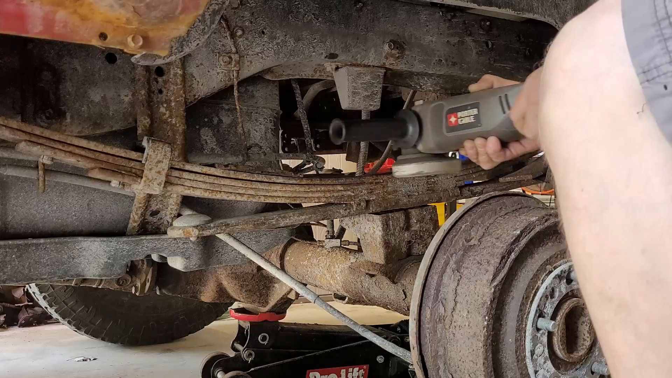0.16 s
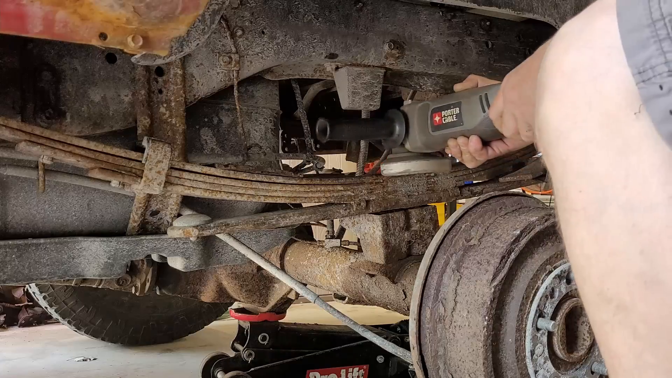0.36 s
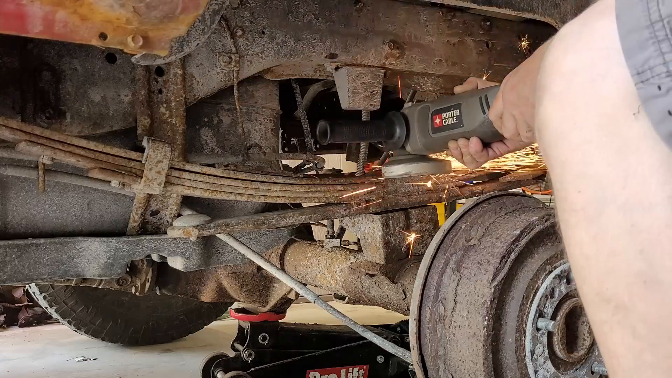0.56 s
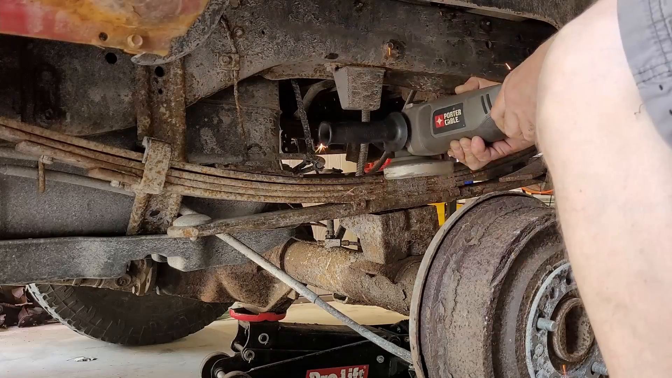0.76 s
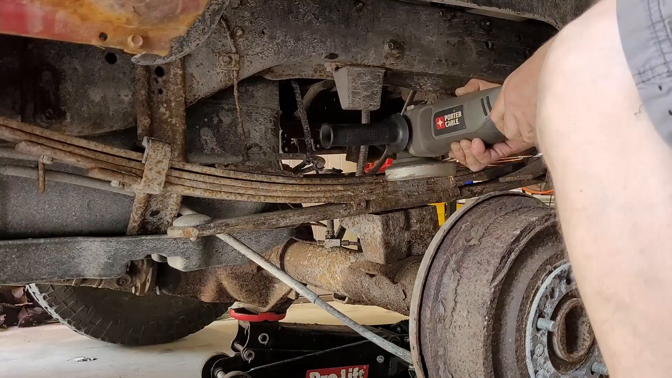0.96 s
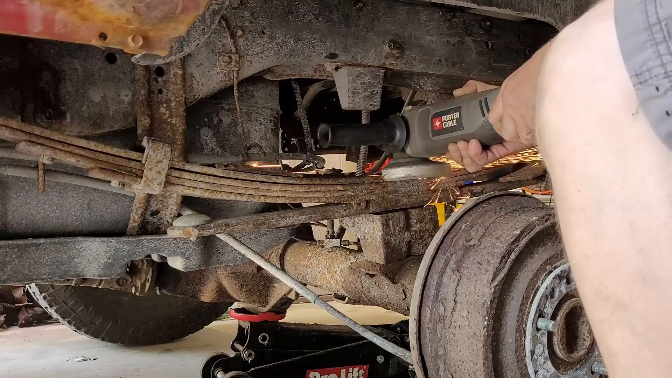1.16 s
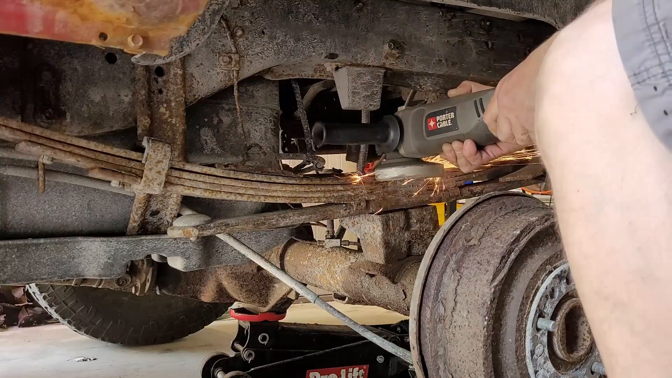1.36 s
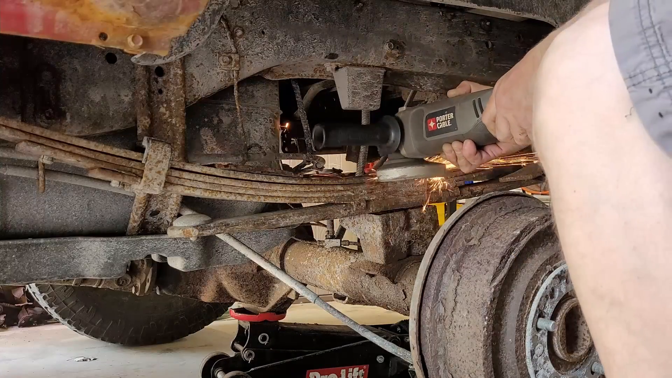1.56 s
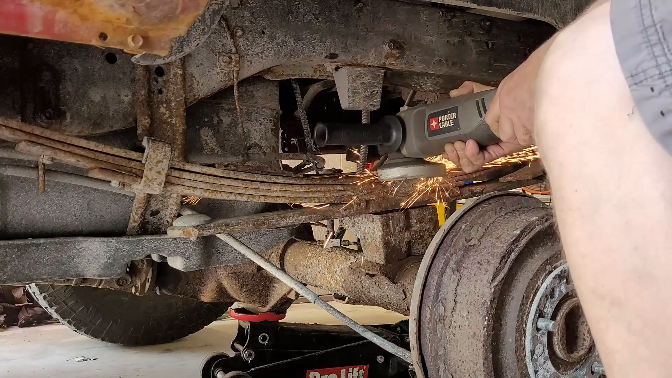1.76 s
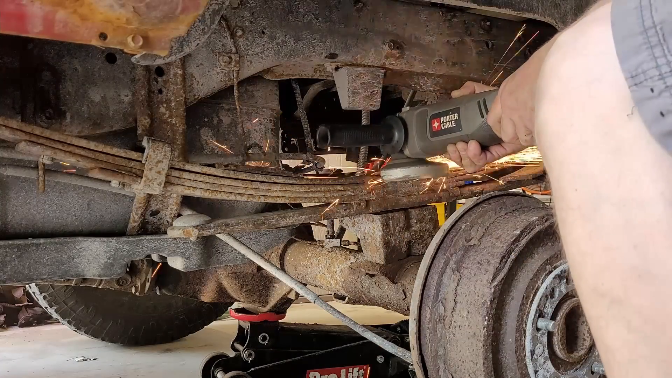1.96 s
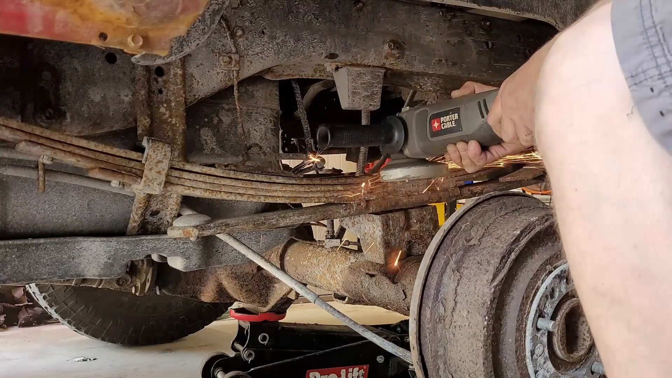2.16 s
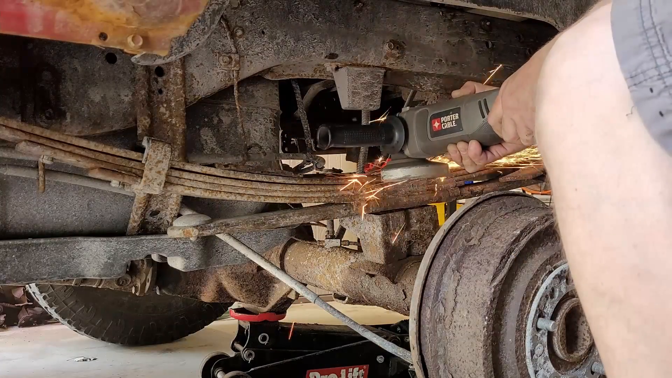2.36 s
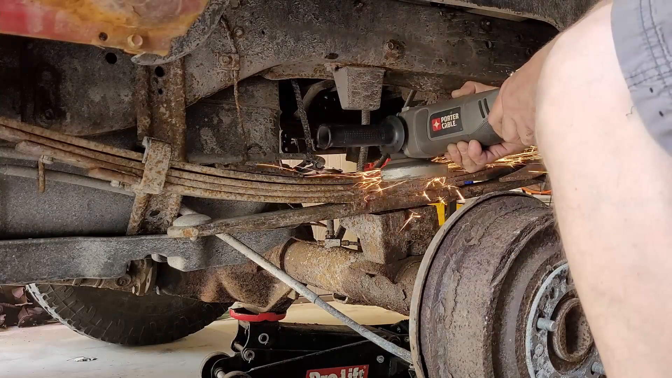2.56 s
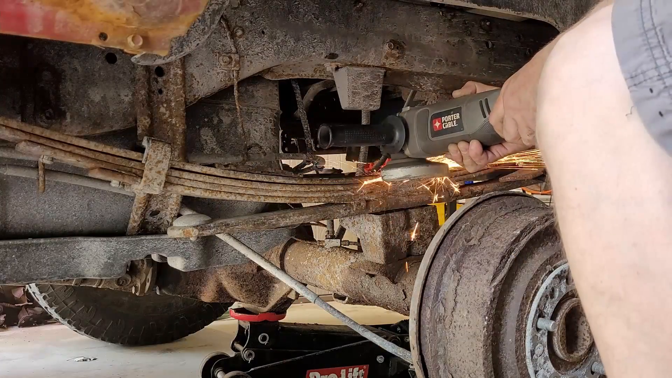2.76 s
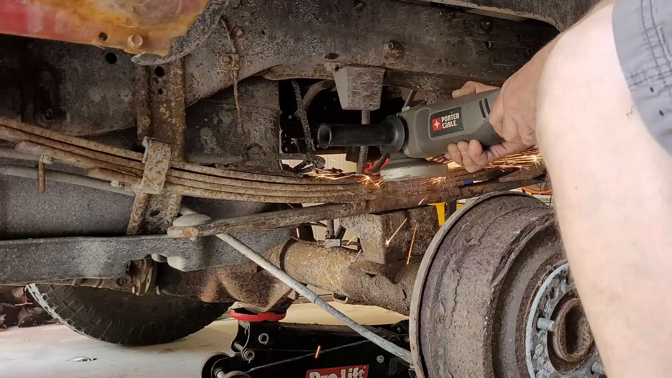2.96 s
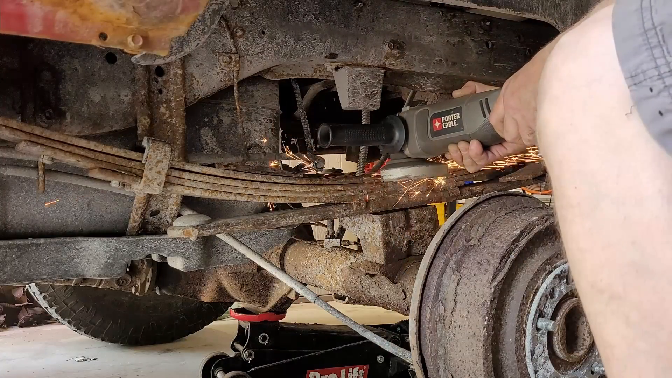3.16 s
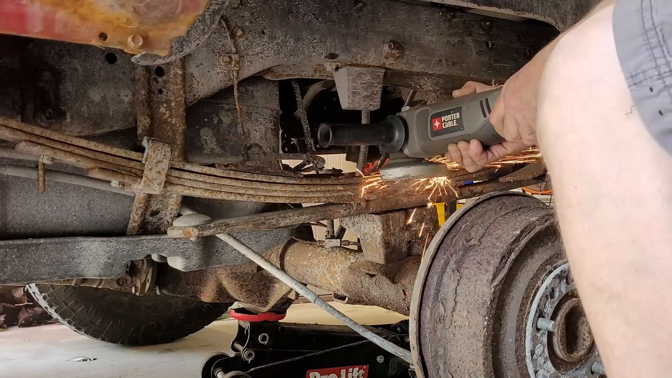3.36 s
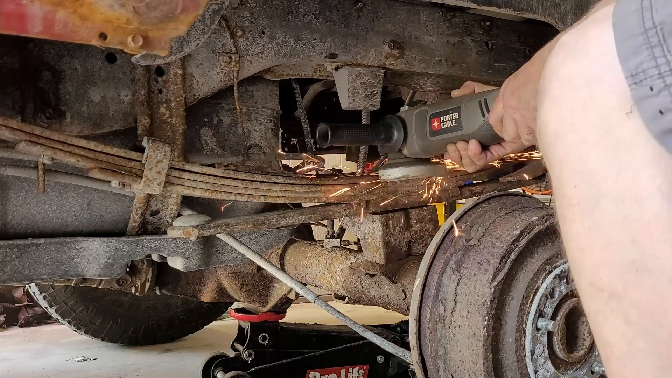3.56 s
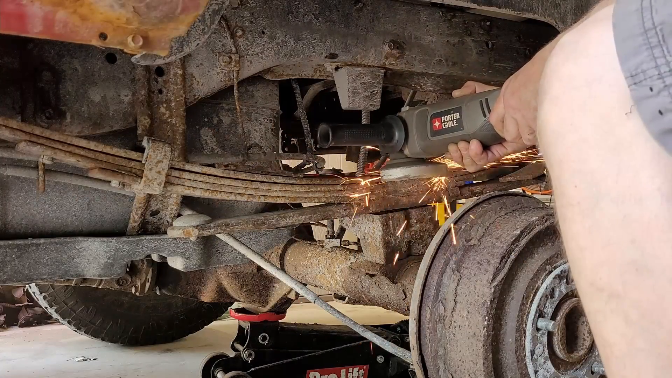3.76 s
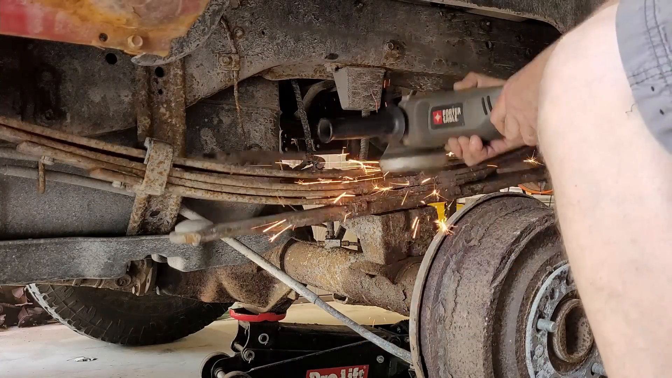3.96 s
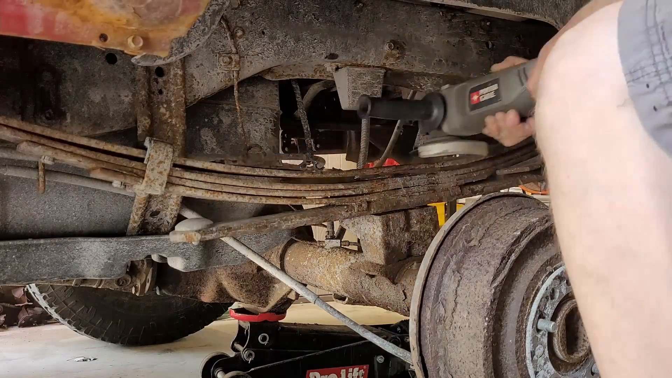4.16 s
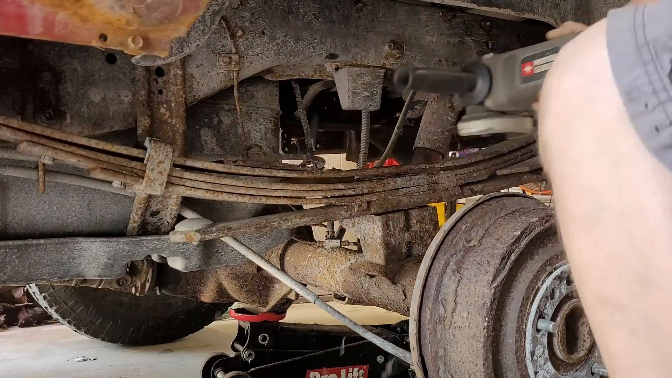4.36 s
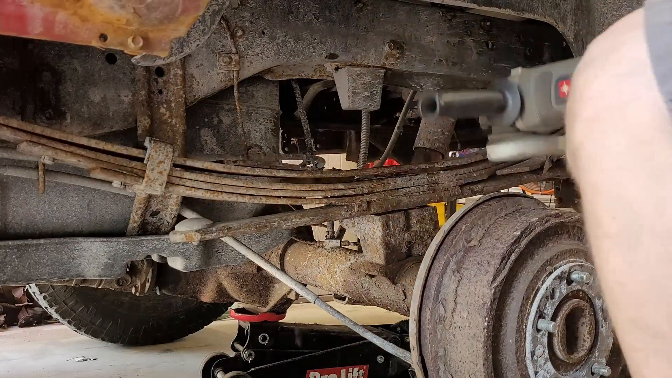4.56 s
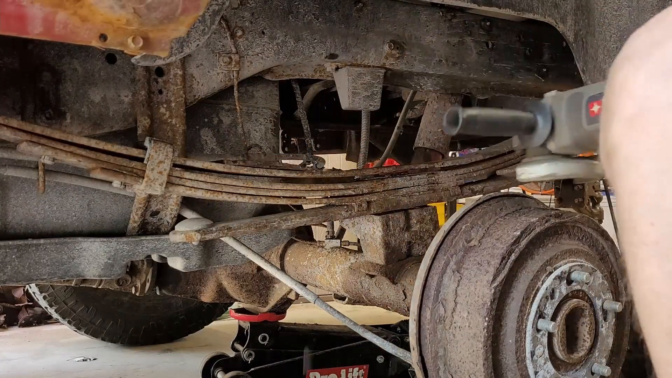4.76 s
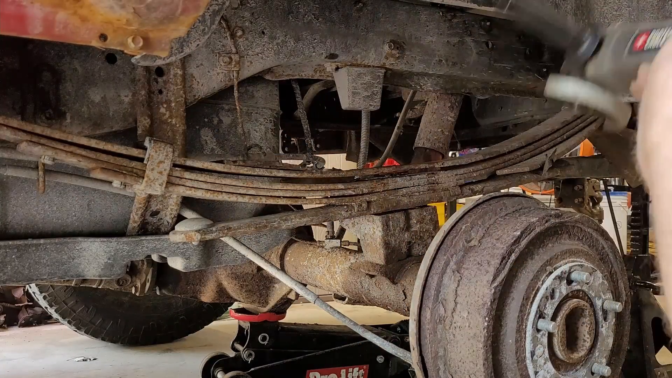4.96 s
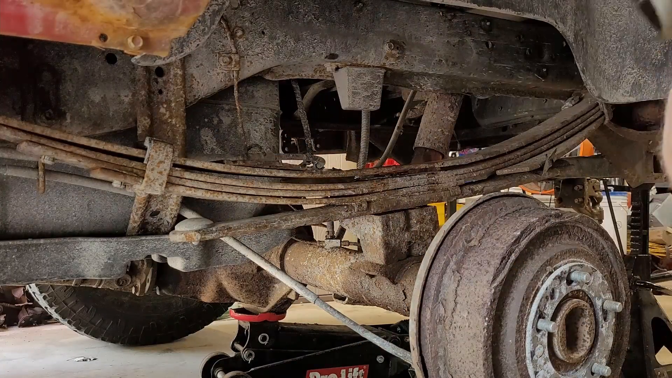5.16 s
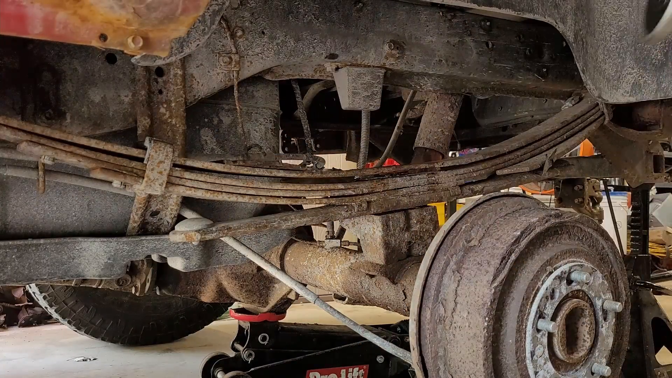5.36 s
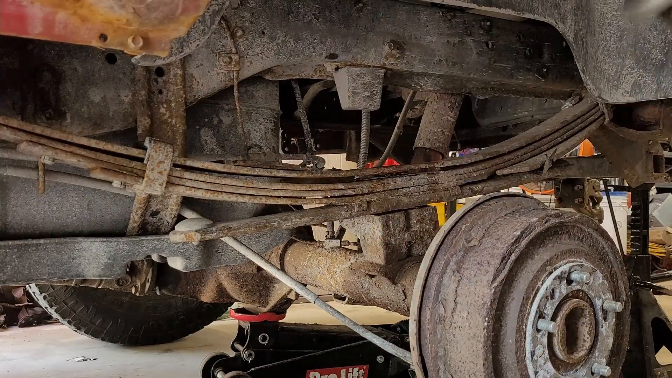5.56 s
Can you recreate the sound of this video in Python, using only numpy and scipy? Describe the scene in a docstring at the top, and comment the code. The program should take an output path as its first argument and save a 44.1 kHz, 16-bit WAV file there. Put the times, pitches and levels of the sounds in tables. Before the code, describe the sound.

An angle grinder bites into rusty steel, its whine sinking, then snags with a bang and winds down rattling.

```python
"""An angle grinder runs free in a garage: fan air rushes and bevel gears rattle over a faint whine.
Its disc bites into a rusty leaf spring under a truck, and abrasion adds a rasping, sparking hiss.
The whine is made of harmonics of motor and disc speed, so it sinks as the load grows, until the
disc snags and kicks back, its impacts setting the chassis booming.
Lifted clear, the tool speeds up, then coasts down with its teeth clattering across their backlash."""
import sys
import numpy as np
from scipy import signal
from scipy.fft import rfft, irfft, next_fast_len
from scipy.io import wavfile
from scipy.ndimage import map_coordinates

SR = 44100
rng = np.random.default_rng(int(sys.argv[2]) if len(sys.argv) > 2 else 0)


def digitize_waveform(pressure):
    """Quantize a signal to 16-bit integers and store it at the path in sys.argv[1].

    Rows of a 2-D input are taken as channels; values are limited to [-1, 1].
    """
    field = np.atleast_2d(pressure).T
    bounded = np.clip(field, -1, 1)
    quanta = np.round(bounded * 32767).astype(np.int16)
    wavfile.write(sys.argv[1], SR, quanta)


N = 247886
TIME = np.arange(N) / SR
BINS = np.maximum(np.arange(N // 2 + 1) * SR / N, 1)   # f/Hz
MOTOR, DISC = 1, 9 / 34   # turns of each shaft per motor turn

# resonances and dips of the spring and the guard: f/Hz, bandwidth/Hz, lift/dB
STEEL_MODES = [(444, 42, 13), (718, 11, 18), (2094, 48, 4), (6850, 390, 3), (7040, 290, -6), (8230, 270, 5),
               (9400, 220, 3.5), (15440, 470, 5.5)]
# noise of the unloaded gears: t/s, level/dB
GEAR_LEVEL = [(0, -29.5), (.45, -28), (.8, -25.5), (4.2, -36), (4.5, -29.5), (4.85, -30.5), (5.08, -35),
              (5.42, -23.5), (5.62, -28)]


def from_db(db):
    """Amplitude grows tenfold every 20 dB."""
    return 10 ** (np.asarray(db) / 20)


def rms_one(x):
    """Normalisation to unit mean power."""
    return x / np.sqrt(np.mean(x ** 2) + 1e-20)


def in_time(curve):
    """Linear interpolation of a (t/s, value) curve at every sample."""
    return np.interp(TIME, *np.transpose(curve))


def over_hz(curve):
    """Interpolation of an (f/Hz, value) curve at every bin, on a logarithmic frequency axis."""
    hz, value = np.transpose(curve)
    return np.interp(np.log(BINS), np.log(hz), value)


def drift(corner_hz):
    """Random fluctuation: low-passed noise of unit power."""
    size = next_fast_len(N)
    hz = np.arange(size // 2 + 1) * SR / size
    spectrum = rfft(rng.standard_normal(size)) / (1 + (hz / corner_hz) ** 2)
    return rms_one(irfft(spectrum, size)[:N])


def swell(s, half_length, db):
    """A Gaussian envelope centred on time s."""
    return from_db(db) * np.exp(-np.minimum(((TIME - s) / half_length) ** 2, 100) / 2)


def bursts(times, levels_db, rise, decay):
    """Incoherent addition: the envelope of short bursts whose powers sum; time constants in seconds."""
    power = np.zeros(N)
    power[np.round(np.asarray(times) * SR).astype(int)] = from_db(levels_db) ** 2
    fall, attack = np.exp(-2 / (decay * SR)), np.exp(-1 / (rise * SR))
    decaying = signal.lfilter([1], [1, -fall], power + 1e-18)
    return np.sqrt(signal.lfilter([1 - attack], [1, -attack], decaying))


def diffuse(gain=1, source=None):
    """A diffuse field is coherent between the ears only in the bass; the default source is white noise."""
    # likeness of the two ears: f/Hz, correlation
    coherence = [(60, 0.5), (125, 1), (250, 0.76), (500, 0.78), (1000, 0.42), (2000, 0.3), (4000, -0.06),
                 (8000, 0)]
    alike = np.clip(over_hz(coherence), -1, 1)
    mid, side = rfft(rng.standard_normal((2, N)) if source is None else source)
    ears = np.sqrt(1 + alike) * mid + np.sqrt(1 - alike) * side * [[1], [-1]]
    return rms_one(irfft(gain * ears, N))


def noise(spectrum, ringing_db=0, source=None):
    """Spectral shaping: diffuse noise of unit power, rolling off below the table's first point."""
    roll_off = 1 + (spectrum[0][0] / BINS) ** 2
    return diffuse(from_db(over_hz(spectrum) + ringing_db) / roll_off, source)


def resonate(x, hz, width):
    """A two-pole resonator of unit peak gain."""
    r = np.exp(-np.pi * width / SR)
    feedback = [1, -2 * r * np.cos(2 * np.pi * hz / SR), r * r]
    return signal.lfilter(np.array([1, 0, -1]) * (1 - r * r) / 2, feedback, x)


def lift_db(hz, resonances):
    """Each resonance lifts nearby frequencies along a Lorentzian curve."""
    return sum(db / (1 + (2 * (hz - centre) / width) ** 2) for centre, width, db in resonances)


def garage(x, wet_db, t60):
    """Reverberation: dense reflections from chassis, floor and walls decay behind the direct sound."""
    tail = diffuse() * from_db(-60 * TIME / t60)
    tail /= np.sqrt(np.sum(tail ** 2) / 2)
    wet = from_db(wet_db)
    reflections = signal.fftconvolve(np.atleast_2d(x), tail, axes=1)[:, :N]
    return (x + wet * reflections) / np.sqrt(1 + wet ** 2)


def touching(attack_s=0.0026, release_s=0.012):
    """Contact gate: 1 while the disc is on the steel, 0 while it is clear."""
    # spells of contact: start t/s, end t/s
    contacts = [(0.531, 0.763), (0.859, 4.015)]
    return sum(np.clip((TIME - start) / attack_s, 0, 1) * np.clip(1 - (TIME - end) / release_s, 0, 1)
               for start, end in contacts)


def firmness(speed, free_hz=539, seated_hz=410):
    """Load slows a motor: 0 with the disc spinning free, 1 with it seated in the cut."""
    return touching() * np.clip((free_hz - speed) / (free_hz - seated_hz), 0, 1)


def once_a_turn(speed, sharpness):
    """Periodic amplitude modulation: one pulse per turn of a shaft, at unit power."""
    return rms_one(np.exp(sharpness * np.cos(2 * np.pi * np.cumsum(speed) / SR)))


def turning_noise(speed, share, rim_points=384, kept_per_turn=0.88):
    """Repetition makes a comb spectrum: a share of the noise returns, slowly changing, each disc turn."""
    turns = np.cumsum(speed * DISC) / SR
    fresh = rng.standard_normal((2, int(turns[-1]) + 2, rim_points))
    rim = signal.lfilter([1], [1, -kept_per_turn], fresh, axis=1)
    repeating = np.array([map_coordinates(side.ravel(), [turns * rim_points], order=3) for side in rim])
    return np.sqrt(share) * rms_one(repeating) + np.sqrt(1 - share) * rng.standard_normal((2, N))


def partial(hz):
    """A gliding sinusoid of unit power with an interaural phase difference."""
    phase = 2 * np.pi * np.cumsum(hz) / SR + rng.uniform(0, 2 * np.pi)
    ear_shift = rng.uniform(-0.88, 0.56) * np.array([[1], [-1]])
    return np.sqrt(2) * np.sin(phase + ear_shift)


def shaft_tone(speed, multiple, db, flutter_db, radiation_top_hz=4610):
    """Forced vibration: in contact, a tone swells as it crosses a resonance; high tones radiate poorly."""
    # resonances and dips of the disc: f/Hz, bandwidth/Hz, lift/dB
    disc_modes = [(1583, 36, -23), (1950, 60, -8), (2160, 200, 3.5), (3030, 140, 1.5), (3170, 78, 5),
                  (3480, 23, 4.5), (3720, 130, -6), (4400, 190, 3.5), (4920, 58, 5)]
    hz = multiple * speed
    steady = from_db(db + touching() * lift_db(hz, STEEL_MODES + disc_modes))
    steady /= np.sqrt(1 + (hz / radiation_top_hz) ** 20)
    return (steady * from_db(flutter_db * drift(30)) + squeal(multiple)) * partial(hz)


def whine(speed):
    """Shaft harmonics, frequency-modulated by a jitter in speed that lessens as the disc seats."""
    # wobble of the disc, strongest when free: multiple of disc speed, level/dB
    wobble_orders = [(2, -56), (4, -58)]
    # tones of the unloaded motor: multiple of motor speed, level/dB
    idle_orders = [(2, -51), (3, -48)]
    seated = firmness(speed)
    shaken = speed * (1 + (0.00039 + 0.002714 * (1 - seated)) * drift(42.5))
    wobble = sum(shaft_tone(shaken, k * DISC, db, flutter_db=2) for k, db in wobble_orders)
    idle = (1 - touching()) * sum(shaft_tone(shaken, k, db, flutter_db=1) for k, db in idle_orders)
    loaded = touching() * singing(shaken, seated)
    return garage(loaded + idle + (1 - 0.72 * seated) * wobble, wet_db=-5.5, t60=0.25)


def fan(echo_gain=0.23):
    """Comb filtering: gusts from the vents interfere with their chassis echo, shifting as the tool moves."""
    # loudness of the fan air, which swells again near the end: t/s, relative level/dB
    air_level = [(0, -37.5), (.8, -34), (2, -38.5), (3.96, -40), (5.1, -38.5), (5.62, -31.5)]
    # colour of the air: f/Hz, spectrum level/dB
    air_spectrum = [(40, -13), (110, -14), (165, -23.5), (260, -3.5), (370, -10), (480, -3.5), (720, 0),
                    (1020, 0.5), (1350, -3.5), (1900, 0.5), (2400, 6), (3100, -1), (4800, -1.5), (6000, -9),
                    (16000, -18)]
    # lag of the echo as the tool is lifted away: t/s, delay/s
    echo_delay = [(4.0, 0.0012), (4.5, .002), (5.62, 0.00269)]
    air = from_db(in_time(air_level) + 9 + 0.93 * drift(23) + 0.62 * drift(3.8)) * noise(air_spectrum)
    echo = np.array([np.interp(TIME - in_time(echo_delay), TIME, side) for side in air])
    return air + echo_gain * echo


def lesser_clatters(count=170, gap_s=0.032, unevenness=0.46):
    """Backlash lets unloaded teeth knock irregularly; rows of t/s, knock level/dB, ping level/dB."""
    lateness, knock_scatter_db, ping_scatter_db = rng.standard_normal((count, 3)).T
    times = gap_s * (np.arange(count) + unevenness * lateness)
    gear_db = np.interp(times, *np.transpose(GEAR_LEVEL))
    free = (times > 0) & (times < TIME[-1]) & (np.interp(times, TIME, touching()) < 0.5)
    return np.transpose([times, gear_db + 4 - knock_scatter_db, gear_db - 17 - ping_scatter_db])[free]


def gears(speed, ping_hz=9290, ping_width_hz=490):
    """Impact excitation: unloaded teeth hiss and knock, ringing the case in pulses at the motor's rate."""
    # hiss of the meshing teeth: f/Hz, spectrum level/dB
    hiss_spectrum = [(400, -25), (1300, -2.5), (2300, -4.5), (3200, -4), (4500, -2), (5800, -10),
                     (8000, -9.5), (10500, -8), (13000, -10), (16000, -15)]
    # loudest clatters across the backlash: t/s, relative knock level/dB, relative ping level/dB
    rattles = [(.112, -21.5, -38), (.125, -25, -38), (0.268, -15, -23), (.368, -16.5, -33),
               (.408, -19, -36), (.429, -16, -40), (4.444, -16.5, -33), (4.462, -19, -26),
               (4.759, -20, -19), (4.781, -20, -28), (4.807, -20, -20.5), (4.833, -22, -36),
               (4.858, -20.5, -24), (4.892, -19.5, -38), (5.123, -17.5, -45), (5.172, -14.5, -46),
               (5.205, -13.5, -44), (5.229, -12, -40), (5.262, -14.5, -42), (5.284, -16, -23),
               (5.329, -17.5, -29), (5.355, -13, -20), (5.383, -12, -36), (5.4226, -8.5, -18),
               (5.43, -14, -30), (5.454, -14, -34), (5.495, -14.5, -26), (5.504, -11, -21),
               (5.545, -12.5, -20), (5.589, -15, -27), (5.609, -23, -30)]
    # modes of the gear case: f/Hz, bandwidth/Hz, relative level/dB
    case_modes = [(2680, 1000, 0), (3930, 1100, 8.5), (4337, 780, 9.5), (10900, 1600, -12)]
    # bright tick of teeth meeting: f/Hz, spectrum level/dB
    tick_spectrum = [(3000, 7), (10000, -5), (16000, -15)]
    hiss_gain = (1 - touching()) * from_db(in_time(GEAR_LEVEL) + 0.98 * drift(56))
    hiss = hiss_gain * noise(hiss_spectrum, source=turning_noise(speed, share=0.45))
    times, knock_db, ping_db = np.vstack([lesser_clatters(), rattles]).T
    teeth = once_a_turn(speed, sharpness=0.21) * diffuse()
    knocks = bursts(times, knock_db, rise=0.0008, decay=0.0093) * teeth
    case = sum((-1) ** k * from_db(db + 5) * resonate(knocks, hz, width)
               for k, (hz, width, db) in enumerate(case_modes))
    taps = bursts(times, ping_db + 16, rise=0.0006, decay=0.0041) * teeth
    ping = resonate(resonate(taps, ping_hz, ping_width_hz), ping_hz, ping_width_hz)
    ticks = bursts(times, knock_db - 8.5, rise=0.00022, decay=0.0022) * noise(tick_spectrum)
    return hiss + ticks + garage(case + ping, wet_db=-2.5, t60=0.11)


def background(hum_hz=79.6, hum_db=-66.5):
    """A low hum wavers by amplitude and phase modulation; bursts of bass noise make a few soft bumps."""
    # the hum grows near the end: t/s, lift/dB
    hum_swell = [(0, 5.5), (4.9, 1.5), (5.62, 18)]
    # soft bumps: t/s, level/dB
    bumps = [(.53, -36), (0.929, -35), (1.58, -40), (4.54, -45)]
    # colour of the bumps: f/Hz, spectrum level/dB
    bump_spectrum = [(20, -24), (52, 5), (80, -11), (200, -22), (600, -50)]
    hum_gain = from_db(hum_db + in_time(hum_swell) + 0.78 * drift(12))
    hum = hum_gain * np.sqrt(2) * np.sin(2 * np.pi * hum_hz * TIME + 0.34 * drift(3))
    return hum + bursts(*np.transpose(bumps), rise=0.0034, decay=0.017) * noise(bump_spectrum)


def singing(speed, seated, light_touch_loss_db=12):
    """Two harmonic series, of motor and of disc, sound under load and grow as the disc seats."""
    # motor harmonics: multiple of motor speed, relative level/dB
    motor_orders = [(1, -55.5), (2, -61), (7, -45.5), (8, -39.5), (9, -36), (10, -37.5), (11, -39),
                    (12, -35.5), (14, -32)]
    # disc harmonics: multiple of disc speed, relative level/dB
    disc_orders = [(12, -48), (16, -62), (17, -37.5), (19, -51), (20, -49), (21, -50.5), (22, -48),
                   (23, -46), (40, -40), (42, -41), (44, -46)]
    load_db = -0.5 - light_touch_loss_db * (1 - seated)
    motor = sum(shaft_tone(speed, k, db + load_db, flutter_db=2.1) for k, db in motor_orders)
    disc = sum(shaft_tone(speed, k * DISC, db + load_db, flutter_db=4.5) for k, db in disc_orders)
    return motor + disc


def cut(speed, spark_db=-24, usual_bite_db=-24.5):
    """Abrasion: grit tears steel in pulses at both shaft rates; grains recur each turn, so the hiss rings."""
    # how hard the grit bites: t/s, relative level/dB
    bite = [(.54, -31), (.66, -25), (.76, -30), (1.0, -27.5), (1.12, -22.5), (1.25, -24), (1.38, -25),
            (1.55, -24), (1.59, -28.5), (1.65, -23.5), (1.715, -27), (1.8, -24), (1.86, -26.5),
            (1.95, -25.5), (3.1, -28.5), (3.95, -28.5)]
    # grit tearing steel: f/Hz, spectrum level/dB
    grinding_spectrum = [(300, -9), (700, -17), (1400, -13.5), (1600, 4), (2200, 2), (2800, 1), (4300, 5),
                         (4950, 2), (5500, -15), (7500, -17), (10000, -20)]
    # the unseated disc scraping rust: f/Hz, spectrum level/dB
    scrape_spectrum = [(500, -31), (1000, 6), (1400, 1), (1800, 6.5), (2500, 8.5), (3200, -4.5), (5000, 0),
                       (6500, 2.5), (9000, -36)]
    # the spark stream: f/Hz, spectrum level/dB
    spark_spectrum = [(2000, -6.5), (5000, -11), (6000, -4.5), (7500, 1.5), (8900, -6.5), (10200, 1),
                      (12500, 3.5), (14000, 2), (15500, 1), (16500, -18.5)]
    bite_db = in_time(bite)
    loose = 1 - firmness(speed)
    pulses = once_a_turn(speed, sharpness=0.098) * once_a_turn(speed * DISC, sharpness=0.024)
    # a lightly held disc skips, so the sound surges
    grit = from_db(0.52 * drift(1000) + (0.5 + 0.54 * loose) * drift(14))
    ringing_db = 0.97 * lift_db(BINS, STEEL_MODES)
    grains = turning_noise(speed, share=0.65 - 0.3 * loose)
    grinding = from_db(bite_db + 3) * (1 - 0.16 * loose) * noise(grinding_spectrum, ringing_db, grains)
    scrape = from_db(bite_db + 2) * loose * noise(scrape_spectrum)
    sputter_db = (0.8 + 0.6 * loose) * drift(20)
    spark_gain = from_db(spark_db + sputter_db + 0.1 * (bite_db - usual_bite_db))
    sparks = spark_gain * noise(spark_spectrum, ringing_db, grains)
    # echoes from the close chassis ripple the spectrum
    return garage(touching() * pulses * grit * (grinding + scrape + sparks), wet_db=-3, t60=0.061)


def leaf_spring(speed, mode_hz=712.8, seated_db=-47):
    """A driven mode: the seated disc keeps the spring ringing faintly, and now and then drives it hard."""
    # flares of the ringing: t/s, half-length/s, level/dB
    flares = [(1.585, 0.032, -32), (1.8, 0.038, -44), (3.473, 0.037, -35.5), (3.925, 0.11, -41)]
    ring = from_db(seated_db) * firmness(speed) + sum(swell(*flare) for flare in flares)
    return ring * from_db(1.7 * drift(7.6)) * partial(mode_hz + 2.97 * drift(18))


def rasp(speed):
    """Modulated friction noise: each shove into the rust rasps in pulses at the rate of the disc."""
    # shoves on the unseated disc: t/s, half-length/s, level/dB
    shoves = [(0.668, .018, -26), (0.727, .008, -26), (1.06, 0.017, -21.5), (1.21, 0.016, -26),
              (1.277, 0.015, -27), (1.346, .025, -32)]
    # colour of the rasp: f/Hz, spectrum level/dB
    rasp_spectrum = [(1200, -11), (1700, -7), (2500, 4), (3400, -6), (12000, -37)]
    envelope = sum(swell(*shove) for shove in shoves)
    return envelope * once_a_turn(speed * DISC, sharpness=0.55) * noise(rasp_spectrum)


def squeal(multiple):
    """Friction squeal: the amplitude added to one shaft harmonic whenever the disc catches."""
    # catches: t/s, shaft, multiple of its speed, half-length/s, level/dB
    catches = [(1.153, MOTOR, 7, .042, -28), (1.39, MOTOR, 8, .025, -30), (1.527, MOTOR, 10, .025, -30),
               (1.657, MOTOR, 9, .022, -35), (1.803, MOTOR, 9, 0.014, -31), (2.03, MOTOR, 10, .08, -33),
               (2.136, DISC, 19, .07, -33.5), (2.22, DISC, 22, .04, -32), (2.304, DISC, 17, 0.09, -38),
               (2.307, MOTOR, 10, 0.042, -35), (2.52, MOTOR, 11, 0.061, -38), (2.63, DISC, 20, 0.092, -34),
               (2.72, DISC, 17, 0.057, -30.5), (2.8, MOTOR, 8, 0.055, -31), (2.973, MOTOR, 9, .06, -33),
               (2.994, DISC, 44, 0.078, -34.5), (3.28, MOTOR, 8, 0.17, -40), (3.327, MOTOR, 12, 0.069, -38),
               (3.497, MOTOR, 9, 0.064, -40), (3.783, MOTOR, 9, 0.13, -37), (3.862, MOTOR, 8, 0.074, -30),
               (3.876, DISC, 22, .05, -38)]
    return sum(swell(s, half_length, db) for s, shaft, k, half_length, db in catches
               if np.isclose(k * shaft, multiple))


def kickback(bounces=9, bounce_s=0.0118, thud_lag_s=0.0078):
    """Inelastic impacts: ever weaker bounces crack at the rim and set the spring and chassis thudding."""
    # the disc snags or knocks on the spring: t/s, crack level/dB, thud level/dB, crack loss per bounce/dB
    blows = [(3.986, -13.5, -16.5, 2.5), (4.02, -19.5, -26, 11), (4.181, -21.5, -23.5, 12)]
    # crack at the rim: f/Hz, spectrum level/dB
    crack_spectrum = [(100, -27), (500, -6), (1200, 0), (2500, 0), (4500, -0.5), (7000, -9), (16000, -33)]
    # thud of spring and chassis: f/Hz, spectrum level/dB
    thud_spectrum = [(25, -20), (42, -10), (60, 3.5), (79, -3), (105, -2), (170, -2.5), (230, -4.5),
                     (310, -4), (440, -6), (560, -9.5), (800, -8.5), (2000, -37)]
    impacts = [(s + k * bounce_s, crack - k * loss, thud - 0.65 * k * loss)
               for s, crack, thud, loss in blows for k in range(bounces)]
    times, crack_db, thud_db = np.transpose(impacts)
    cracks = bursts(times, crack_db, rise=0.00048, decay=0.019) * noise(crack_spectrum)
    thuds = bursts(times + thud_lag_s, thud_db, rise=0.0016, decay=0.012) * noise(thud_spectrum)
    return garage(cracks, wet_db=-7.5, t60=0.79) + garage(thuds, wet_db=-5.5, t60=1.6)


def boom(start_s=3.997, rise_s=0.0031):
    """Free vibration: after the snag the chassis modes decay exponentially, the lowest lingering longest."""
    # modes of spring and chassis: f/Hz, level/dB, t60/s
    chassis_modes = [(62.6, -26, 1), (159.6, -27.5, .4), (111.5, -18, 0.2), (225, -30.5, 0.69),
                     (469, -16, 0.12), (586, -15.5, 0.071)]
    age = np.maximum(TIME - start_s, 0)
    ringing = sum(from_db(db - 60 * age / t60) * np.sin(2 * np.pi * hz * age)
                  for hz, db, t60 in chassis_modes)
    return ringing * (1 - np.exp(-age / rise_s))


def scene():
    """Superposition of all sources; an interaural level difference leans the treble to the left."""
    # the motor sinks under load, recovers, then coasts down: t/s, rotation f/Hz
    motor_speed = [(0, 500), (1.0, 532), (1.4, 509), (1.65, 458), (1.85, 437), (1.98, 426), (2.15, 414.5),
                   (2.3, 409.5), (2.45, 404.5), (2.6, 397.5), (2.82, 392.3), (3.0, 379.3), (3.32, 371),
                   (3.52, 353.2), (3.72, 352.6), (3.9, 359), (4.03, 345), (4.2, 425), (4.6, 484),
                   (5.62, 374)]
    # balance of the ears: f/Hz, left minus right level/dB
    balance = [(250, -0.6), (600, 0.5), (2000, 0.1), (4000, 2.1), (8000, 0.5), (13000, 3.5)]
    speed = in_time(motor_speed)
    grinder = whine(speed) + leaf_spring(speed) + cut(speed) + rasp(speed) + fan() + gears(speed)
    mix = grinder + kickback() + boom() + background()
    return irfft(rfft(mix) * from_db(over_hz(balance) * [[0.5], [-0.5]]), N)


def record(dry, low_hz=42.5, top_hz=15780):
    """Band limiting: a small microphone loses the deepest bass, and the top is cut steeply."""
    thin = signal.sosfilt(signal.butter(2, low_hz, "high", fs=SR, output="sos"), dry)
    return signal.sosfilt(signal.ellip(12, 0.1, 90, top_hz, fs=SR, output="sos"), thin)


dry = scene()
out = record(dry)
digitize_waveform(out)
```